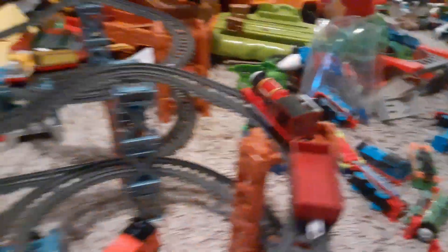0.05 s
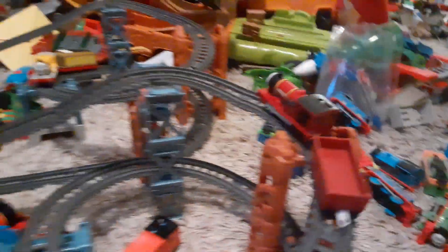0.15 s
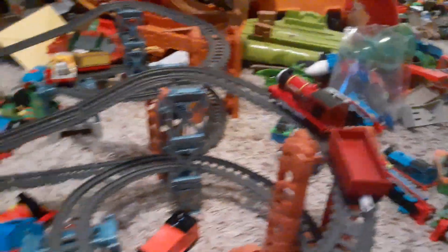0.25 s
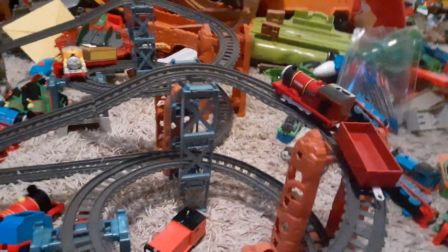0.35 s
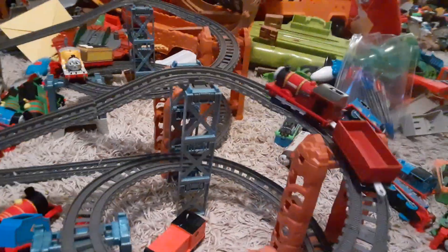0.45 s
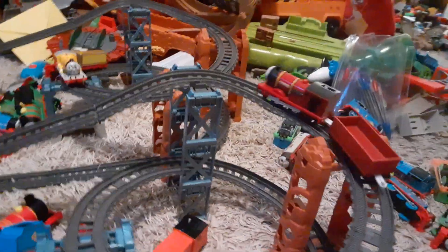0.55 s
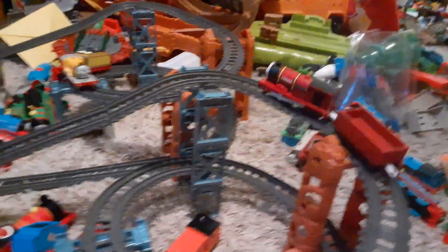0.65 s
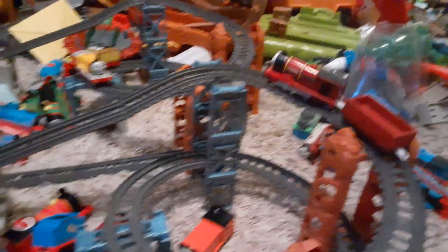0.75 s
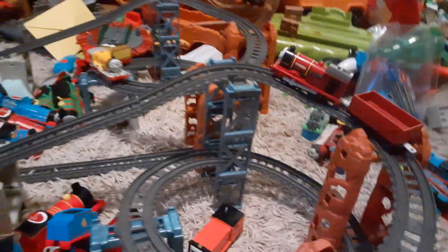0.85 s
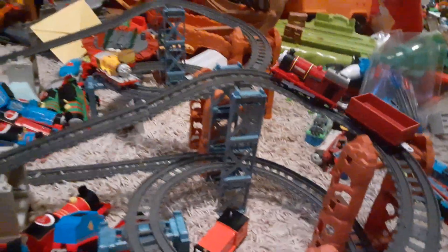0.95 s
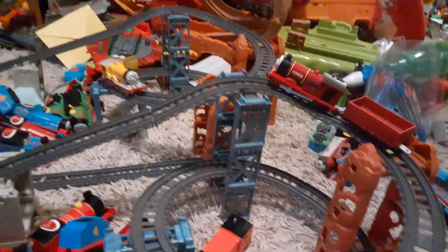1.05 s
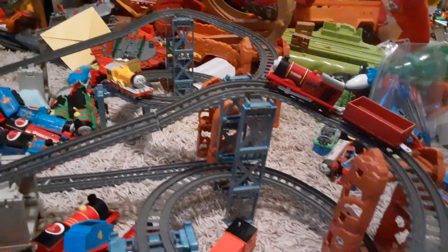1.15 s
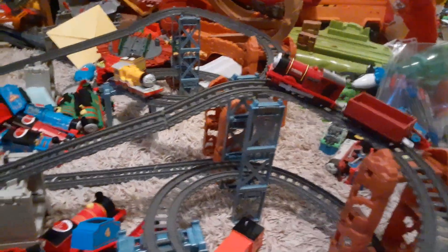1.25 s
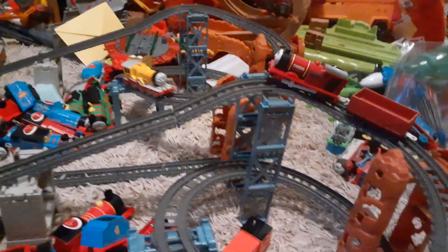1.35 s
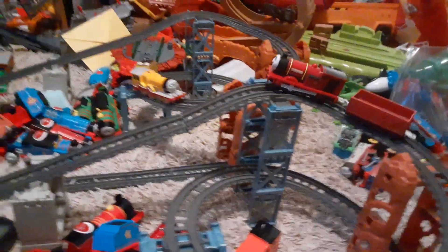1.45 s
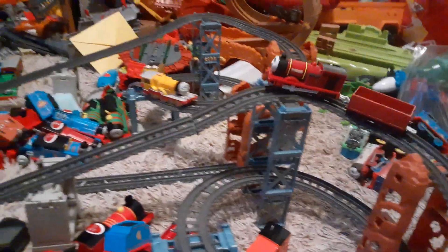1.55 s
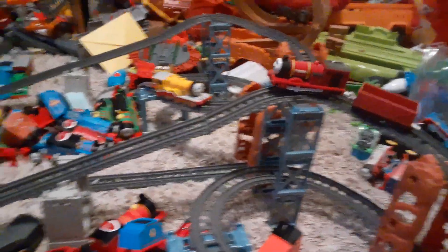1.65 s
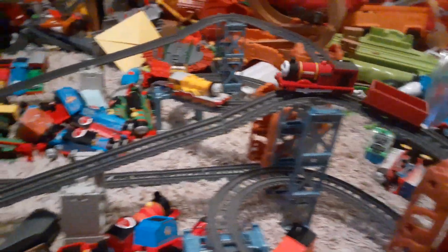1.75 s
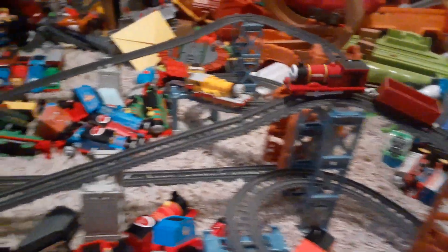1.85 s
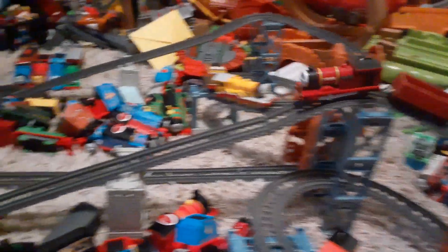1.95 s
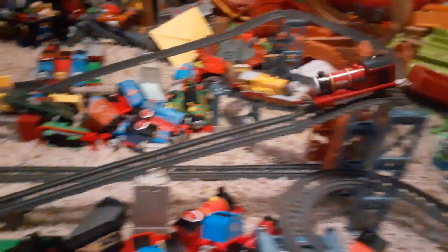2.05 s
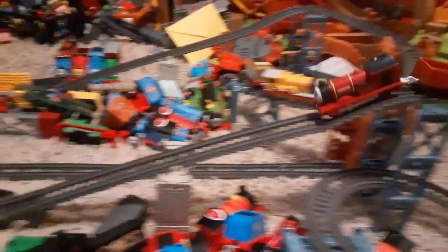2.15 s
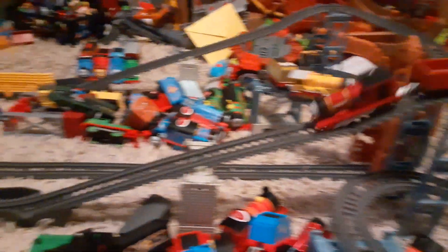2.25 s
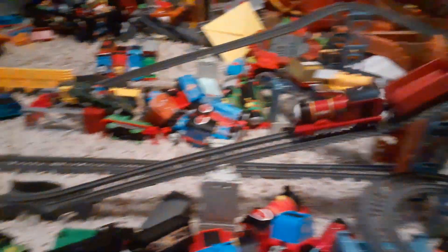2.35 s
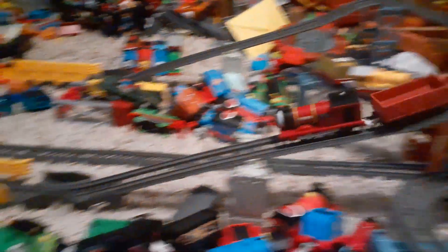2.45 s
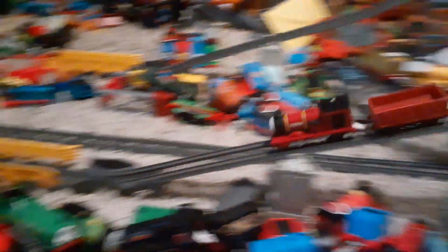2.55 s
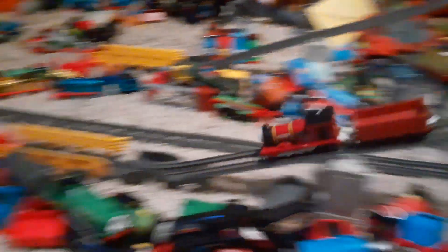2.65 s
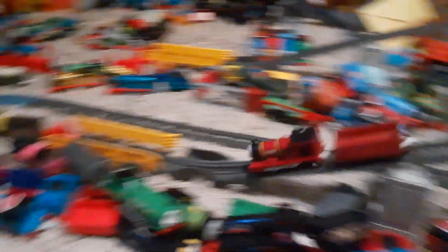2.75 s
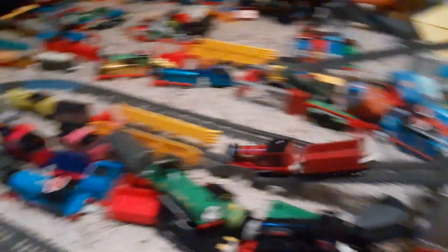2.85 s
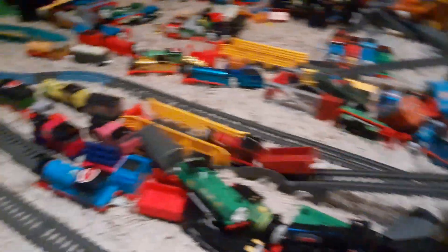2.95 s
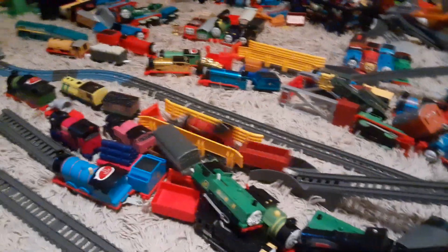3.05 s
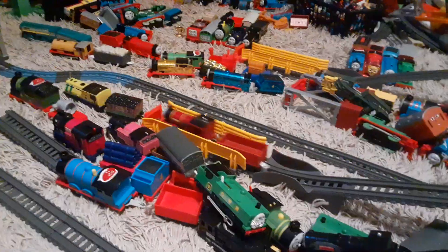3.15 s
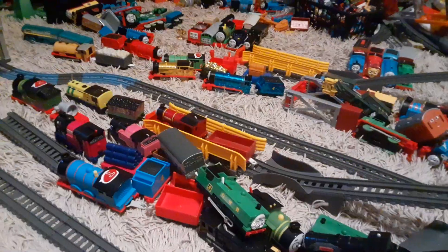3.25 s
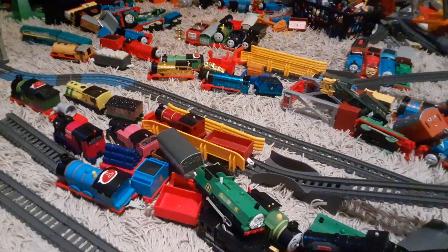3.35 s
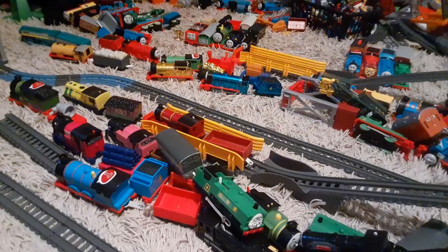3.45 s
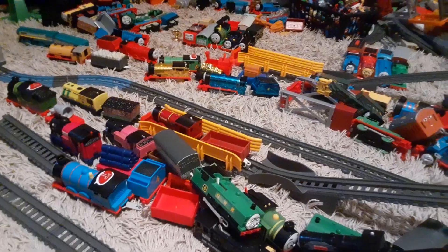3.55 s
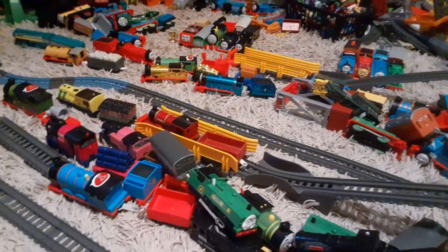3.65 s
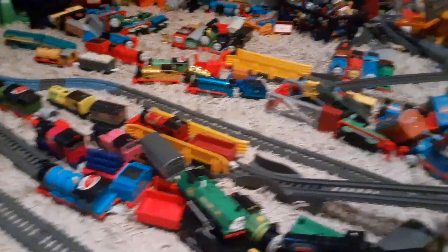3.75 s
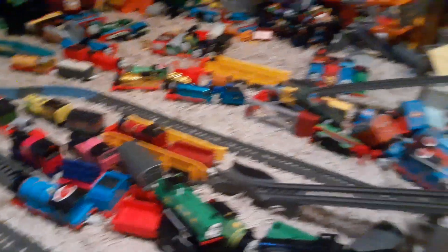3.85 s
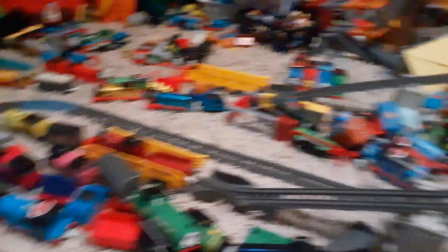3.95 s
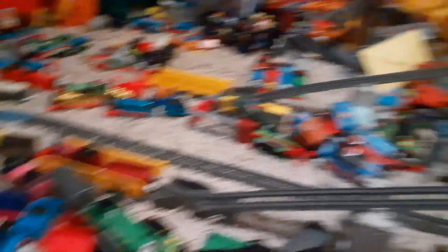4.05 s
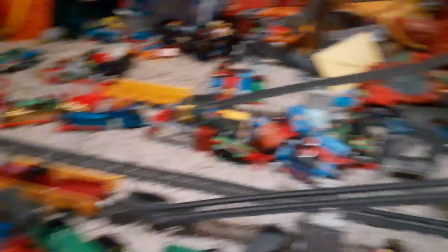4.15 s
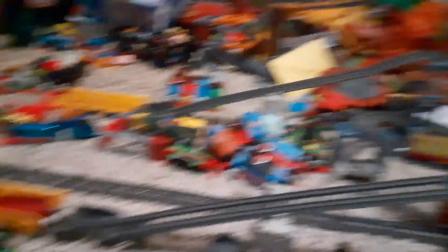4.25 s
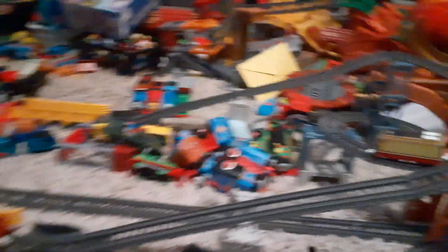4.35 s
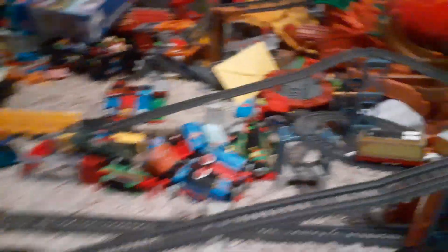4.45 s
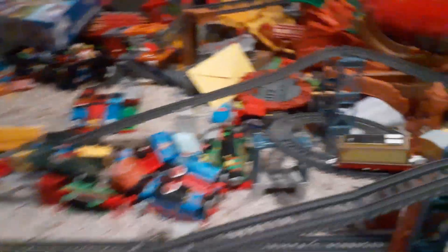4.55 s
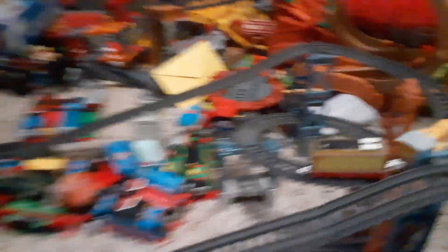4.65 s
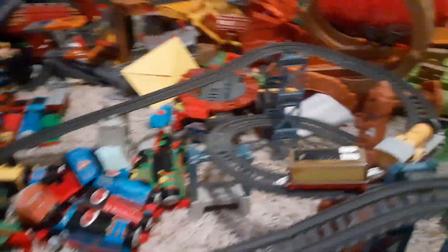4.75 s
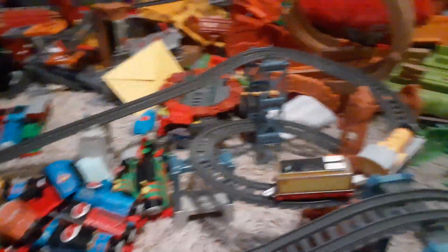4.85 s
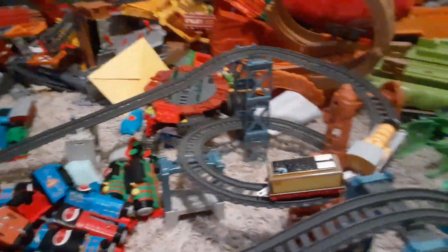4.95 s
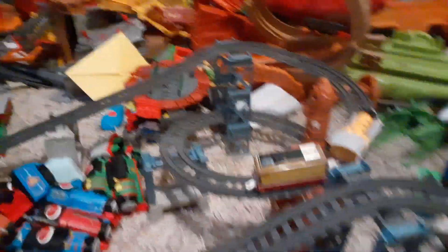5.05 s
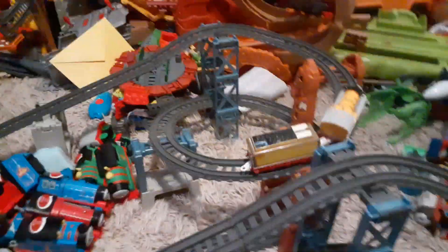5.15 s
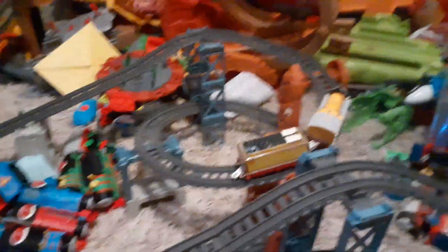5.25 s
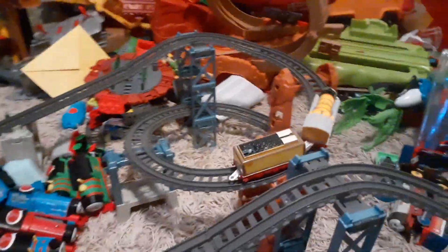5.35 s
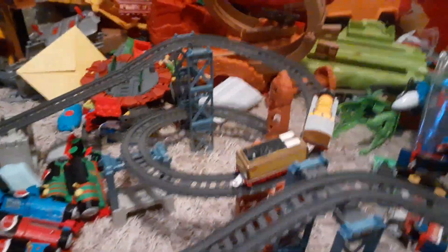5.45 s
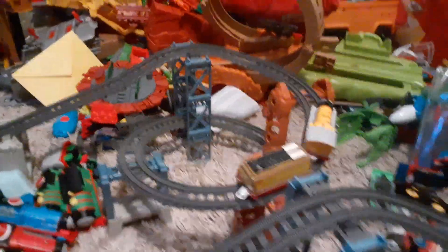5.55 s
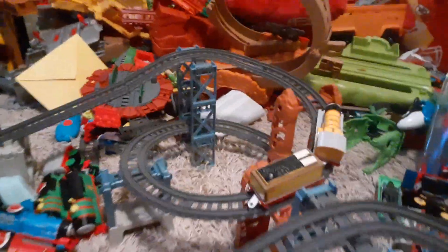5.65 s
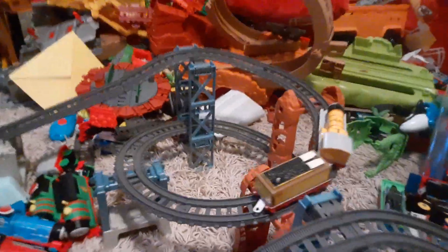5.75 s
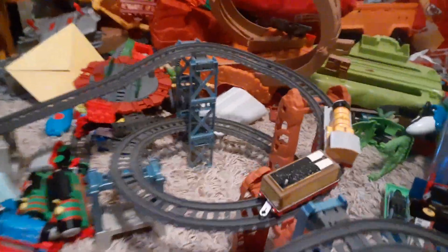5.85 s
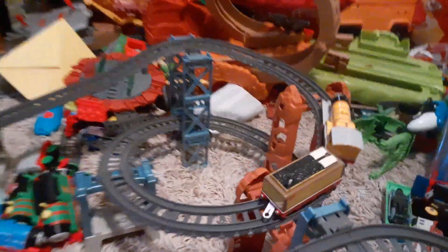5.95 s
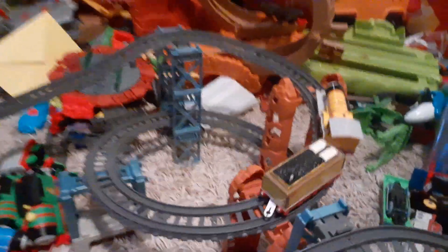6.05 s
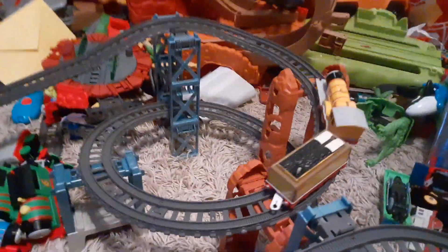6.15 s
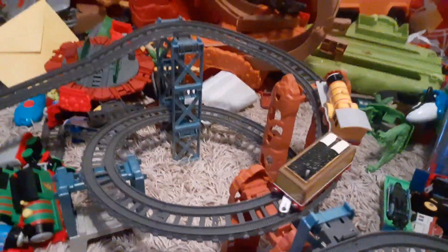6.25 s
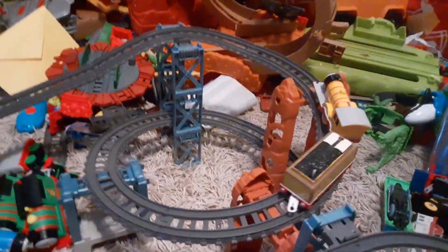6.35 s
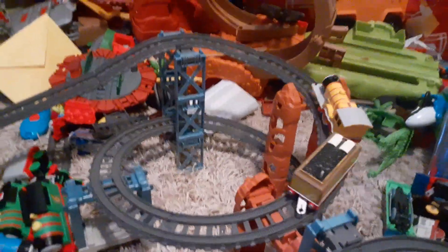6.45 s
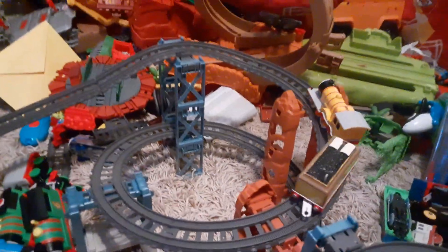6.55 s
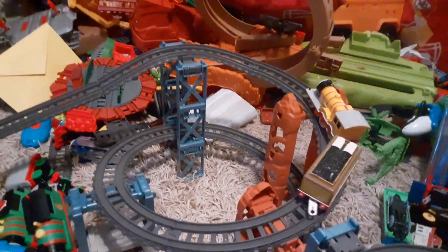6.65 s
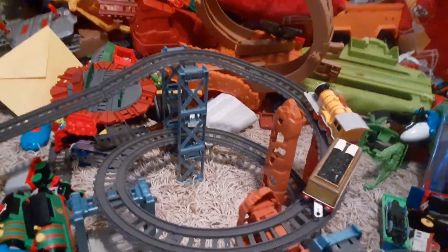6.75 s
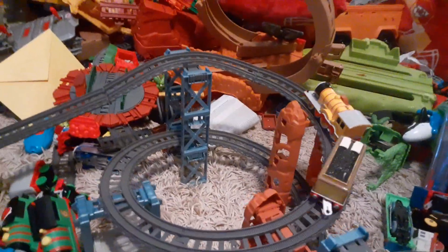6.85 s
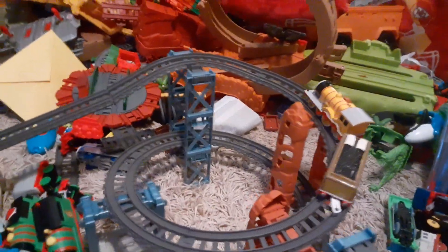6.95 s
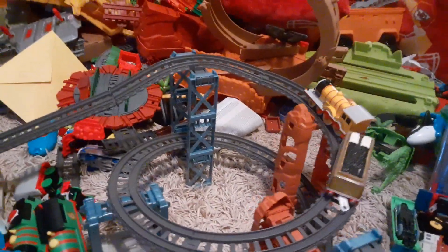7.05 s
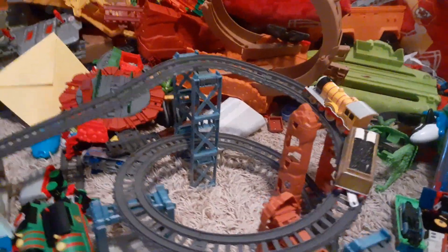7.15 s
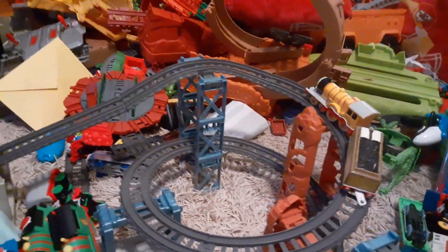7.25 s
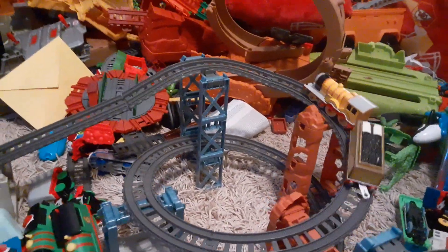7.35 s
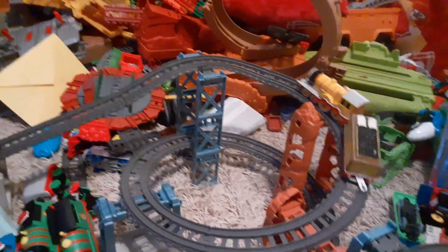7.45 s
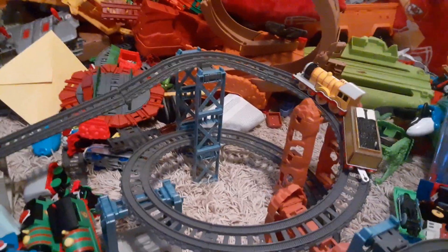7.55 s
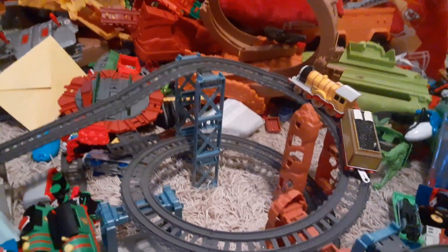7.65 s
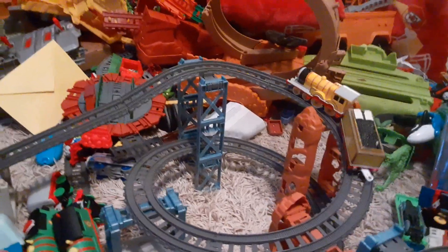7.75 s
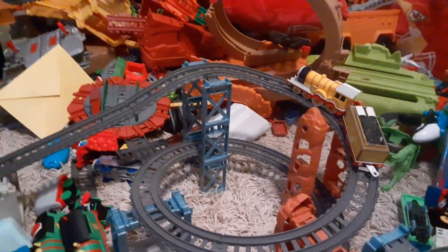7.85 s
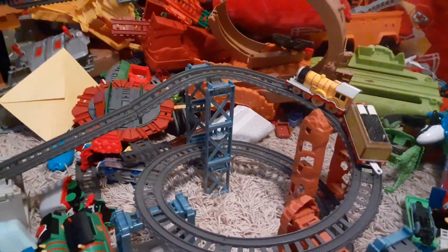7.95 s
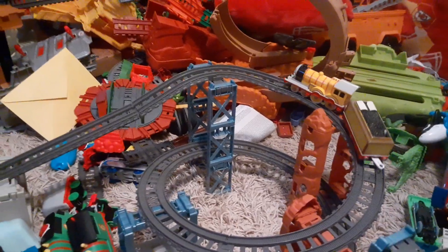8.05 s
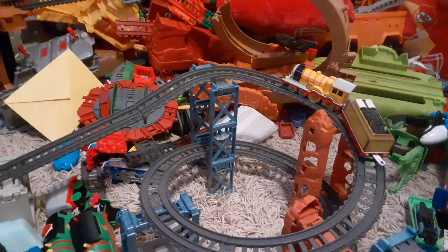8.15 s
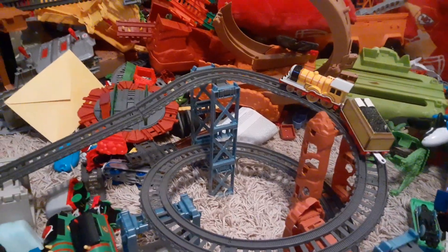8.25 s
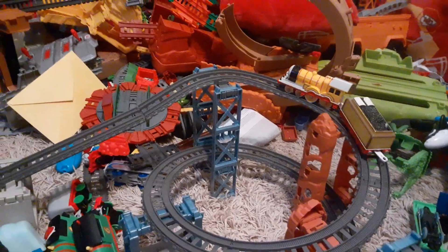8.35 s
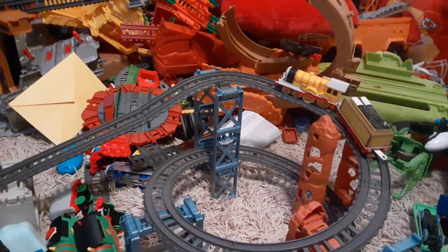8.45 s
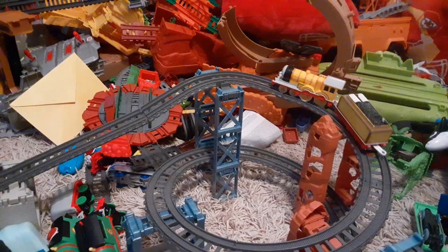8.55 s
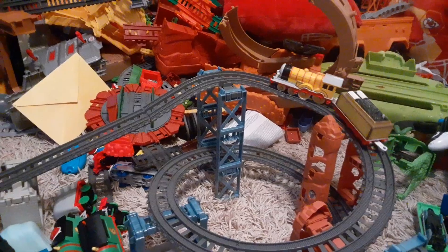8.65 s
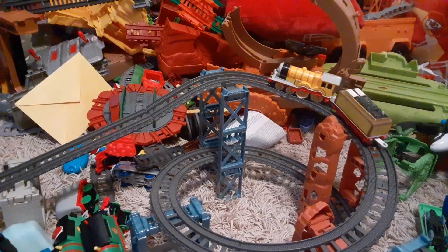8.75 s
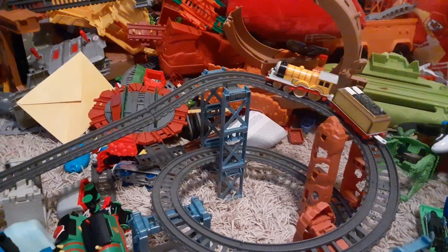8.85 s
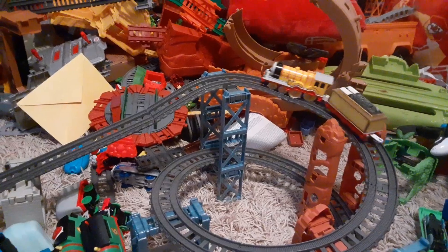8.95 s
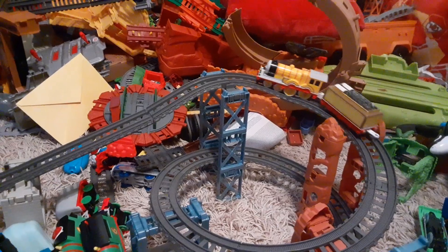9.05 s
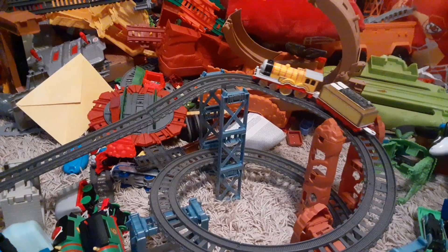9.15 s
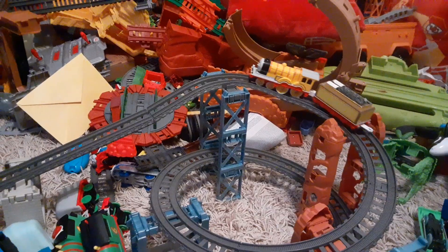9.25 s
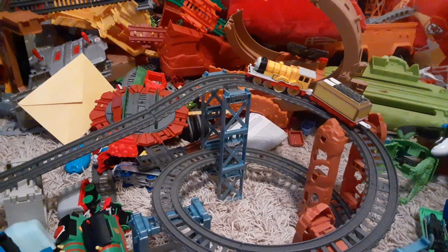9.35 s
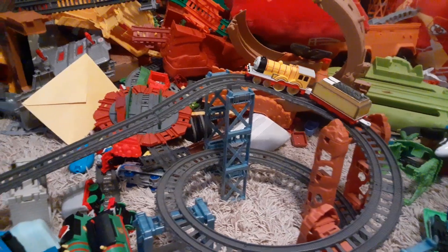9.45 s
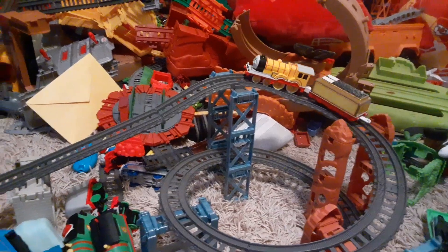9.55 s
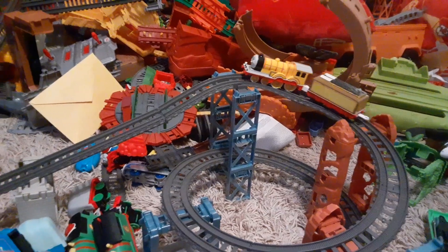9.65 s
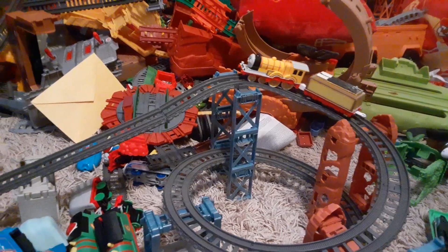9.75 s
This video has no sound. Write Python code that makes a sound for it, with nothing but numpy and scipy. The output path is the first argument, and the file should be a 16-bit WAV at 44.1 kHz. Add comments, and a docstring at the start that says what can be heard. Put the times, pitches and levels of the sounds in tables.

```python
"""On a carpeted floor, two battery toy trains climb a plastic spiral track, followed by a hand-held
microphone. The red one whirs close by as gear teeth excite its shell, then clatters over the joints of
a hollow ramp and away. The yellow one labours uphill, a gear snapping some fifty times a second.
Fingers knock, creak and rub on the microphone's case, which conducts the vibration to its two ports."""
import sys
import numpy as np
from scipy import signal
from scipy.fft import rfft, irfft, next_fast_len
from scipy.io import wavfile
from scipy.ndimage import uniform_filter1d

SR = 44100
rng = np.random.default_rng(int(sys.argv[2]) if len(sys.argv) > 2 else 0)


def pcm_store(signal):
    """Save signal as 16-bit PCM."""
    levels = np.round(np.clip(np.atleast_2d(signal), -1, 1) * 32767)
    wavfile.write(sys.argv[1], SR, levels.astype(np.int16).T)


N = 432180
TIME = np.arange(N) / SR
SIZE = next_fast_len(N + SR // 4, True)
HZ = np.maximum(np.arange(SIZE // 2 + 1) * SR / SIZE, 1)
SIDES = np.array([[1], [-1]])   # left, right


def red_train():
    """Forced vibration: gear rattle and wheel impacts drive the modes of the shell and the hollow ramp."""
    # wheels striking track joints: t/s, level re rattle/dB, level of the hollow ring/dB
    clacks = [(2.0773, 11.5, -56), (2.1213, 8, -45), (2.3065, 12, -40), (2.426, 8, -40), (2.6, 10.5, -35),
              (2.805, 4, -31), (2.919, 11, -12.5), (2.962, 7, -23), (3.0314, 10, -13), (3.0602, 9, -12),
              (3.094, 14, -36), (3.1727, 11, -34)]
    # spectral envelopes of the shell, the ramp and the ramp's drumming: f/Hz, level/dB
    shell_colour = [(300, -37), (850, -25), (1100, -26), (1700, -16.5), (3500, -12.5), (4700, -10.5),
                    (5500, -11.5), (7000, -1.5), (7900, -7.5), (8900, -23), (10000, -23), (11400, -15.5),
                    (13300, -12.5), (16000, -22.5)]
    ramp_colour = [(300, -23), (850, -18), (1100, -12.5), (1700, -8.5), (2200, -3), (3700, -10.5),
                   (5000, -8.5), (6800, -3.5), (7900, -9), (9000, -23.5), (10000, -18.5), (11200, -13),
                   (13200, -8.5), (16000, -20)]
    drum_colour = [(25, -49), (60, -19), (200, -4), (420, -1), (650, -2), (900, -0.5), (1400, -16)]
    # resonances on the climb, the crest and the ramp: f/Hz, bandwidth/Hz, gain/dB
    climb_modes = [(1104, 50, 7), (1350, 110, 9), (2000, 120, 9), (2770, 150, 7.5), (3270, 100, 4.5),
                   (4900, 390, 5.5), (5970, 850, 5.5)]
    crest_modes = [(1085, 81, 13), (1710, 400, 9), (2600, 400, 6), (3120, 210, 3), (4600, 340, 3),
                   (6100, 310, 2.5), (7600, 400, -1)]
    ramp_modes = [(1053, 98, 5), (1230, 55, 6.6), (1950, 68, 3.7), (2390, 40, 2.1), (2790, 160, 4.5),
                  (3200, 29, 2.9), (5400, 160, 1.5)]
    # level of the gears' rasp as the train turns and the microphone follows: t/s, level/dB
    levels = [(0, -28.5), (.35, -29), (1.15, -28), (1.85, -30), (2.06, -33), (2.36, -25), (2.85, -23),
              (3.06, -26), (3.45, -42.5)]
    # direction of the train: t/s, left-right level/dB
    pan = [(0, 1), (1.0, 1), (2.2, -1.5), (3.3, 2)]
    crest, downhill = ramp_up(.5, 1.5), ramp_up(2.0, 2.5)
    level_db = in_time(levels)
    # the low band fades over the crest and booms on the hollow ramp
    body_db = -10.5 - 4 * ramp_up(0.47, 0.99) + 6 * ramp_up(1.1, 2.6)
    gears = np.sqrt(2.26 + 0.49 * teeth(per_s=390, spread_db=2.0, ring_s=.0011) ** 2)
    flutter_db = 0.48 * np.sin(2 * np.pi * 49 * TIME) + (0.84 + 0.67 * downhill) * drift(70)
    gears *= from_db(flutter_db)
    joint_s, clack_db, ring_db = np.transpose(clacks)
    impacts = clicks_at(joint_s, from_db(clack_db)) + ribs(per_s=16, level_db=5, spread_db=4)
    force = stereo_noise() * np.hypot(gears, decay(impacts, 0.009))
    shell = filtered(force * (1 - crest), body(shell_colour, climb_modes))
    shell += filtered(force * crest * (1 - downhill), body(shell_colour, crest_modes))
    track = filtered(force * downhill, body(ramp_colour, ramp_modes))
    # the joints ring with a hollow note, most of all near the foot of the ramp
    blows = decay(clicks_at(joint_s, from_db(ring_db)), 0.013)
    joint_colour = [(1400, -34), (2100, -12), (2900, 0), (3400, -4), (4200, -28)]   # f/Hz, level/dB
    joints = filtered(stereo_noise() * blows, body(joint_colour, ramp_modes))
    drum = filtered(force, body(drum_colour))
    drum *= from_db(level_db + body_db - 24 + 5 * downhill) / band_rms(drum, 300, 1200, span_s=0.46)
    engine = radiate(scatter(shell + track, strength=0.21), level_db, body_db, fizz_db=-2, pan=pan)
    return (engine + joints + drum) * (1 - ramp_up(3.33, 3.48))


def teeth(per_s, spread_db, ring_s):
    """Shot noise: random tooth impacts of uneven size add up to an envelope of rms 1."""
    hits = rng.random(N) < per_s / SR
    sizes = from_db(spread_db * np.minimum(rng.exponential(1, N), 4))
    envelope = decay(hits * sizes, ring_s)
    return envelope / np.sqrt(np.mean(envelope ** 2))


def ribs(per_s, level_db, spread_db):
    """A Poisson process: on the way down the wheels strike the ramp's ribs by chance."""
    hits = rng.random(N) < per_s / SR * ramp_up(1.8, 2.1)
    return hits * from_db(level_db + spread_db * rng.standard_normal(N))


def yellow_train():
    """Impulse excitation: a snapping gear rings the shell over the steady whir of the other teeth."""
    # spectral envelope of the shell: f/Hz, level/dB
    shell_colour = [(150, -22.5), (450, -18), (820, -21.5), (1050, -12.5), (1750, -13), (2400, -14),
                    (3500, -13), (5000, -9), (6600, -2.5), (7600, -8), (8800, -22.5), (9800, -28.5),
                    (11400, -21.5), (16000, -22.5)]
    # resonances far off, on the tight loop and on the climb: f/Hz, bandwidth/Hz, gain/dB
    far_modes = [(1330, 51, 1.5), (1546, 73, 11), (3100, 380, 7.8), (3990, 240, 12), (4540, 470, 11.5),
                 (6170, 1100, 5.8)]
    loop_modes = [(388, 130, 5.6), (1020, 58, 4.2), (1295, 75, 7.8), (1460, 170, 7.7), (2810, 580, 9.8),
                  (3820, 200, 6.9), (5830, 240, 3.3), (6100, 130, 1.7)]
    climb_modes = [(993, 53, 10.4), (1310, 300, 13.1), (2020, 130, 12), (2800, 600, 16.3), (3840, 150, 8.2),
                   (4800, 150, 1.9), (6660, 180, 2.2)]
    # level of the gears' rasp at the microphone: t/s, level/dB
    levels = [(3.45, -44), (4.15, -46.5), (4.62, -38.5), (5.1, -37.5), (6.1, -38.5), (6.95, -40.5),
              (7.3, -39), (8.36, -42), (9.25, -39.5), (9.8, -41.5)]
    # direction of the train: t/s, left-right level/dB
    pan = [(3.6, -2.5), (4.4, -0.5), (5.1, 1), (6.2, 0), (9.8, 1)]
    near, climb = ramp_up(4.45, 5.05), ramp_up(5.6, 6.5)
    loop = near * (1 - climb)
    snaps, rebounds = gear_snaps()
    burst = uniform_filter1d(decay(snaps + rebounds, .0013), size=28)
    whir = from_db(.8 * drift(400)) * stereo_noise()
    # the snap is bright; the shell's low modes answer it and ring on: f/Hz, level/dB
    bright = body([(900, -19), (2800, -6.5), (4500, 3.0), (6500, 5), (9000, 5.5), (14000, 4.5)])
    hollow = body([(500, -23.0), (1000, 6.5), (1500, -6.0), (2300, -13), (6000, -50)])
    force = whir + from_db(15.5) * filtered(np.tanh(stereo_noise()) * burst, bright)
    force += from_db(16.5) * filtered(stereo_noise() * decay(rebounds, 0.0019), hollow)
    # on the tight loop every snap also pings one stiff mode of the shell
    age = np.arange(400) / SR
    ping = np.sin(2 * np.pi * 6400 * age) * np.exp(-age / 0.00055)
    force += from_db(21.5) * signal.fftconvolve(snaps * loop, ping)[:N]
    stretches = [(1 - near, far_modes), (loop, loop_modes), (climb, climb_modes)]
    shell = sum(filtered(force * share, body(shell_colour, modes)) for share, modes in stretches)
    scattered = scatter(shell, strength=0.17)
    engine = radiate(scattered, in_time(levels), body_db=-8.5, fizz_db=-6 - 3.5 * loop, pan=pan)
    return engine * ramp_up(3.33, 3.45)


def gear_snaps(in_phase_s=3.4063, rebound_s=.0014):
    """Quasi-periodic impacts: once a turn the gear snaps, then rebounds more weakly."""
    # rotation frequency, sagging and recovering with the load: t/s, f/Hz
    rotation = [(3.398, 50.79), (3.723, 53.45), (4.095, 48.36), (4.851, 48.44), (5.032, 48.91),
                (5.615, 48.75), (5.924, 51.04), (6.145, 47.17), (6.342, 50.43), (6.923, 49.95),
                (7.13, 53.19), (7.765, 47.79), (7.908, 50.89), (8.379, 47.59), (8.774, 57.05),
                (8.914, 53.47), (9.147, 54.81), (9.8, 53.6)]
    turns = np.cumsum(in_time(rotation)) / SR
    turns -= np.interp(in_phase_s, TIME, turns)
    snap_s = TIME[1:][np.diff(np.floor(turns)) > 0]
    snap_late, snap_size, rebound_late, rebound_size = rng.standard_normal((len(snap_s), 4)).T
    snap_s += .00012 * snap_late
    snaps = clicks_at(snap_s, from_db(1.6 * snap_size))
    rebounds = clicks_at(snap_s + rebound_s + .00033 * rebound_late, from_db(-8.5 + 2.2 * rebound_size))
    return snaps, rebounds


def radiate(x, level_db, body_db, fizz_db, pan):
    """Superposition: low shell body and top fizz, set relative to the gears' rasp, follow its level."""
    below = 1 / (1 + (HZ / 3700) ** 12)
    above = 1 - 1 / (1 + (HZ / 9300) ** 20)
    rasp = 1 - below - above
    bands = [(below, body_db, 900, 3600), (rasp, 0, 4000, 8500), (above, fizz_db, 10000, 16000)]
    out = sum(filtered(x, response) * from_db(db) / band_rms(x, low_hz, high_hz, span_s=.2)
              for response, db, low_hz, high_hz in bands)
    return out * from_db(level_db + SIDES * in_time(pan) / 2)


def scatter(x, strength, count=5):
    """Scattering: nearby toys and track return short echoes whose paths change as the train moves."""
    out = np.array([np.roll(x[0], 4), x[1]])   # the left port hears 4 samples later
    treble = filtered(out, HZ ** 2 / (HZ ** 2 + 1800 ** 2))   # small things reflect only short waves
    for k, path_s in enumerate(np.geomspace(.002, .011, count)):
        delay = path_s * rng.uniform(.85, 1.15) + .00012 * drift(2)
        for side in range(2):
            echo = np.interp(TIME - delay - .00005 * rng.normal(), TIME, treble[side])
            out[side] += strength * (-1) ** k * echo
    return out


def handling(lag_s=0.00071, pan_db=-0.4):
    """Structure-borne sound: the case carries finger noise; its slow shake reaches the left port later."""
    cracks, shake = knocks()
    shake = shake + rubbing()
    delayed = np.interp(TIME - lag_s, TIME, shake)
    ports = np.array([delayed, shake]) * from_db(SIDES * pan_db / 2)
    return ports + cracks + creaks()


def knocks():
    """Impact response: each knock gives a crack, then a thud and a low wobble that shake the case."""
    # finger knocks: t/s, thud peak level/dB, thud f/Hz, crack level re thud/dB
    taps = [(2.816, -26, 140, -20), (3.911, -31, 277, -20), (4.209, -34.5, 316, -16),
            (4.268, -22, 152, -9.5), (4.299, -22, 157, -9.5), (4.345, -21, 160, -9.5),
            (4.37, -34, 217, -17), (6.039, -18.5, 131, -10), (7.366, -25.5, 178, -1), (7.664, -22, 134, -9),
            (7.763, -16.5, 123, -8), (8.381, -41.5, 130, -23), (8.94, -39, 100, -23),
            (9.088, -42.5, 93, -26)]
    cracks, shake = np.zeros((2, N + SR))
    wobble = from_db(-20) * damped_swing(hz=67, spread=0.15, samples=8000)
    for s, db, hz, crack_db in taps:
        crack_hz = 800 * from_db(0.4 * crack_db)   # a sharper knock cracks higher
        crack = from_db(crack_db) * damped_swing(crack_hz, spread=0.31)
        thud = damped_swing(hz, spread=0.55)
        for out, lag_s, swing in ((cracks, .00086, crack), (shake, .0021, thud), (shake, .0041, wobble)):
            i = int((s + lag_s) * SR)
            out[i:i + len(swing)] += from_db(db) * swing
    return cracks[:N], shake[:N]


def creaks(slips=3, spacing_s=.014, jitter_s=.00305, loss_db=0.5, slip_hz=413):
    """Stick-slip motion: a creak is a few uneven slips, each a little weaker and at its own pitch."""
    # the case creaking in the grip: t/s, peak level/dB
    onsets = [(6.268, -48), (6.759, -37.5), (7.186, -43), (7.454, -40.5), (7.861, -43), (8.045, -35),
              (8.481, -38.5), (8.766, -42), (9.424, -44.5)]
    out = np.zeros(N)
    for s, db in onsets:
        for k, (late, pitch) in enumerate(rng.standard_normal((slips, 2))):
            slip = damped_swing(slip_hz * from_db(1.04 * pitch), spread=0.17, samples=3000)
            i = int((s + k * spacing_s + jitter_s * late) * SR)
            out[i:i + len(slip)] += from_db(db - loss_db * k) * slip
    return out


def rubbing(attack_s=0.0074, release_s=0.027, resting_db=-75):
    """Friction noise: skin sticks and lets go on the case, so each shift of grip comes in lumps."""
    # shifts of grip: t/s, duration/s, level/dB
    grips = [(2.16, 0.34, -64), (2.46, 0.49, -44.5), (3.372, 0.08, -50.5), (3.95, 0.49, -56.5),
             (4.585, 0.14, -54.5), (4.986, .05, -47), (5.553, 0.34, -59.5), (7.3, .53, -47),
             (7.905, 0.24, -48), (8.318, 0.15, -48)]
    # spectral envelope of the rubbing: f/Hz, level/dB
    colour = [(20, -33), (35, -23), (55, -4), (130, -0.5), (220, -6), (350, -11), (600, -32), (1500, -40)]
    pressure = from_db(resting_db) * ramp_up(2.0, 2.6)
    for s, length_s, db in grips:
        release = np.exp(-np.maximum(TIME - s - length_s, 0) / release_s)
        pressure += from_db(db) * ramp_up(s, s + attack_s) * release
    lumpy_noise = rng.standard_normal(N) * from_db(7.9 * np.clip(drift(55), -2, 1.3))
    rub = filtered(lumpy_noise, body(colour))
    return pressure * rub / rub.std()


def room_tone(level_db=-70.5):
    """Stationary noise: the quiet room is a faint, mostly low rumble."""
    # spectral envelope of the room's noise: f/Hz, level/dB
    colour = [(20, -32), (35, -15), (55, 3), (150, -12), (400, -11), (900, -32), (4000, -24)]
    room = filtered(stereo_noise(), body(colour))
    return from_db(level_db) * room / room.std()


def stereo_noise():
    """Partial coherence: noise is alike at both ports in the bass and nearly unrelated in the treble."""
    # likeness of the two ports: f/Hz, correlation coefficient
    likeness = [(200, 0.65), (700, 0.75), (1300, 0.67), (2500, 0.5), (5000, 0.12), (9000, 0.12),
                (15000, 0.076)]
    alike = at_hz(likeness)
    mid, side = filtered(rng.standard_normal((2, N)), np.sqrt([1 + alike, 1 - alike]))
    return mid + side * SIDES


def body(colour, modes=()):
    """Modal response: a broad spectral envelope times a set of resonance peaks."""
    cepstrum = irfft(np.log(from_db(at_hz(colour))), SIZE)
    # folding the cepstrum gives minimum phase: nothing sounds before its cause
    cepstrum[1:SIZE // 2] *= 2
    cepstrum[SIZE // 2 + 1:] = 0
    peaks = sum((from_db(db) - 1) / (1 + 2j * (HZ - hz) / width) for hz, width, db in modes)
    return np.exp(rfft(cepstrum)) * (1 + peaks)


def damped_swing(hz, spread, samples=4000):
    """Impulse response of a wide resonance, which dies within a few cycles; peak 1."""
    sos = signal.butter(2, [hz / (1 + spread), hz * (1 + spread)], "band", fs=SR, output="sos")
    swing = signal.sosfilt(sos, signal.unit_impulse(samples))
    return swing / np.abs(swing).max()


def decay(clicks, seconds):
    """Exponential decay after each click, with the given time constant."""
    return signal.lfilter([1], [1, -np.exp(-1 / (seconds * SR))], clicks + 1e-18)


def clicks_at(times, sizes):
    """An impulse train."""
    return np.bincount(np.clip(np.asarray(times) * SR, 0, N - 1).astype(int), sizes, N)


def drift(per_s):
    """Continuous random fluctuation with standard deviation 1."""
    knots = np.arange(int(N / SR * per_s) + 2)
    return np.interp(TIME * per_s, knots, rng.standard_normal(len(knots))) * np.sqrt(3 / 2)


def band_rms(x, low_hz, high_hz, span_s):
    """Running rms of one band of the two sides' mean."""
    band = filtered(x.mean(axis=0), (HZ > low_hz) & (HZ < high_hz))
    return np.sqrt(uniform_filter1d(band ** 2, int(span_s * SR)) + 1e-14)


def filtered(x, response):
    """Linear filtering: the spectrum times a frequency response."""
    return irfft(rfft(x, SIZE) * response, SIZE)[..., :N]


def ramp_up(start_s, end_s):
    """Linear rise from 0 to 1, lasting at least 10 ms."""
    return np.clip((TIME - start_s) / max(end_s - start_s, .01), 0, 1)


def in_time(points):
    """Linear interpolation of a curve at every sample."""
    return np.interp(TIME, *np.transpose(points))


def at_hz(points):
    """Interpolation of a curve on a logarithmic frequency axis."""
    hz, value = np.transpose(points)
    return np.interp(np.log(HZ), np.log(hz), value)


def from_db(db):
    """Level to amplitude ratio."""
    return 10 ** (np.asarray(db) / 20)


def scene():
    """Superposition of both trains, the hand and the quiet room."""
    return red_train() + yellow_train() + handling() + room_tone()


def record(dry, low_hz=38, high_hz=16000):
    """Transduction: each port colours the sound, saturation rounds the peaks, and the band is limited."""
    # unequal sensitivity of the two ports: f/Hz, left-right level/dB
    imbalance = [(400, 3), (1400, 3), (2200, 2), (3300, 4.5), (5000, 1), (6600, 7.5), (7150, 4),
                 (7900, -11.5), (9400, 4.5), (10700, -5.5), (12300, 0.5), (13900, -13), (15300, 0.5)]
    ports = from_db(SIDES * at_hz(imbalance) / 2)
    ports /= np.sqrt(np.mean(ports ** 2, axis=0))
    rounded = .8 * np.tanh(filtered(dry, ports) / .8)
    trimmed = signal.sosfilt(signal.butter(2, low_hz, "high", fs=SR, output="sos"), rounded)
    return filtered(trimmed, 1 / np.sqrt(1 + (HZ / high_hz) ** 600))


dry = scene()
out = record(dry)
pcm_store(out)
```